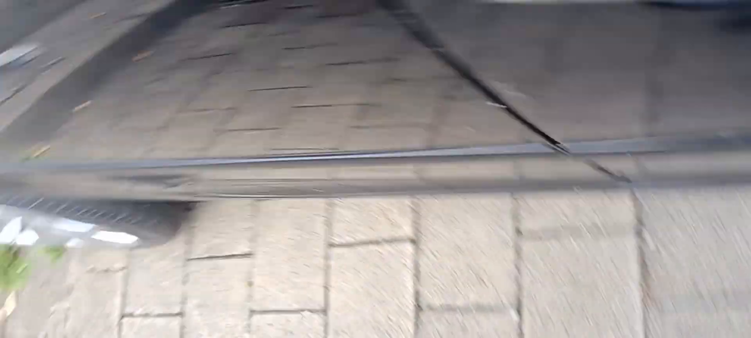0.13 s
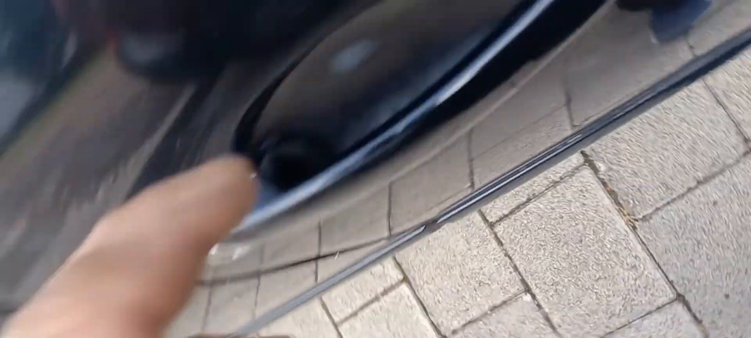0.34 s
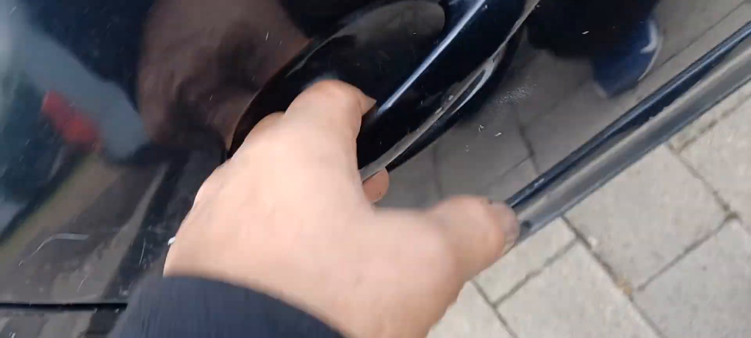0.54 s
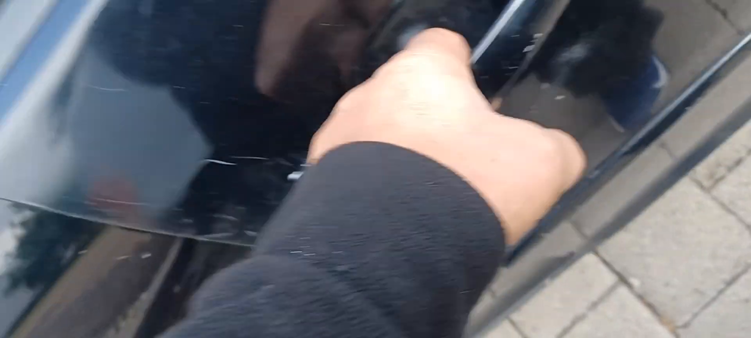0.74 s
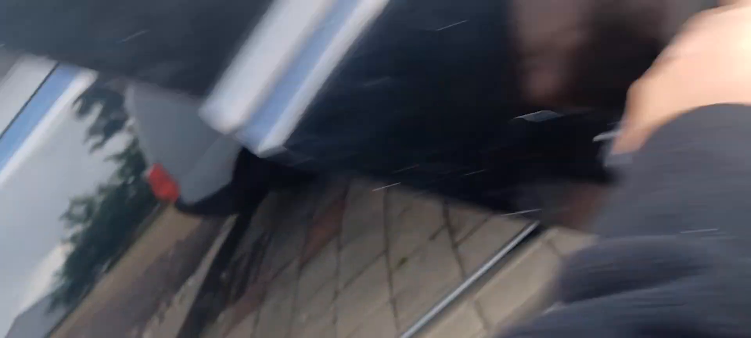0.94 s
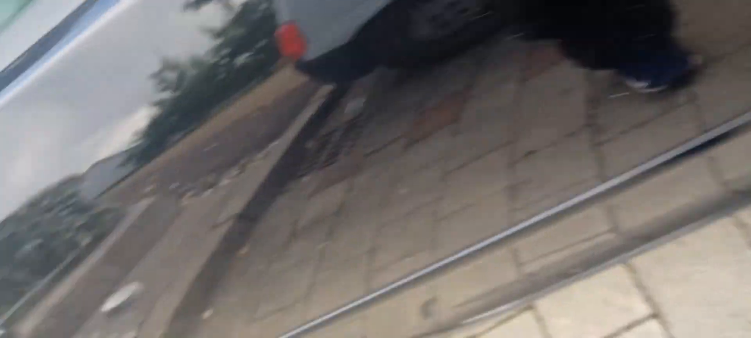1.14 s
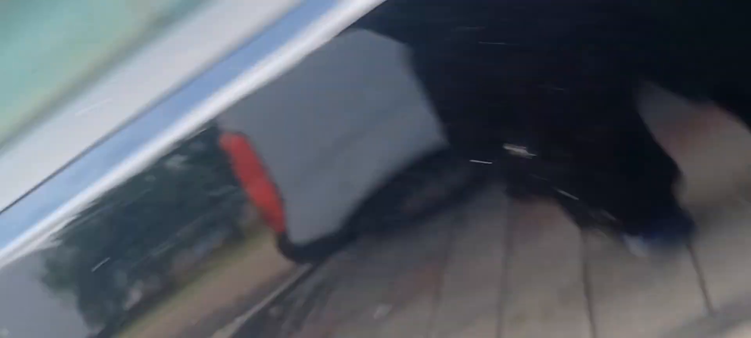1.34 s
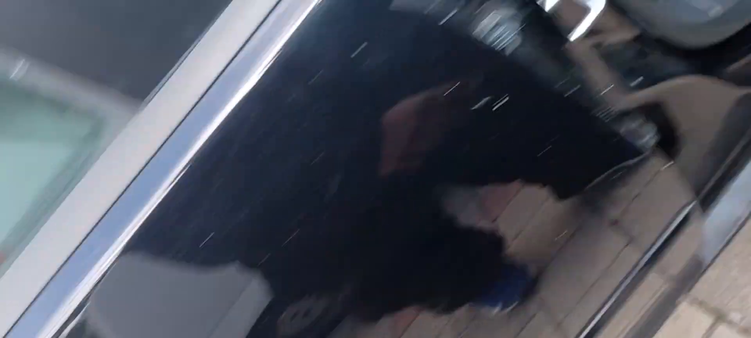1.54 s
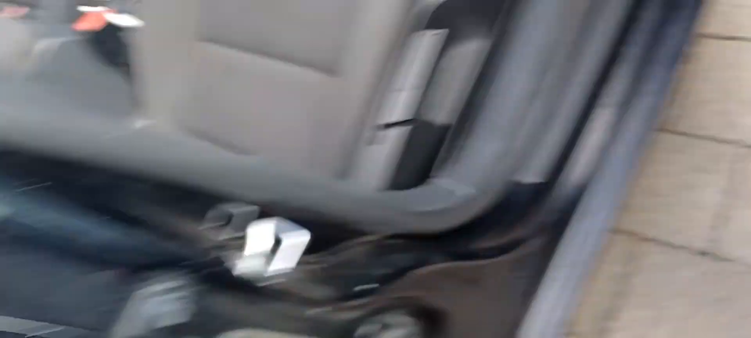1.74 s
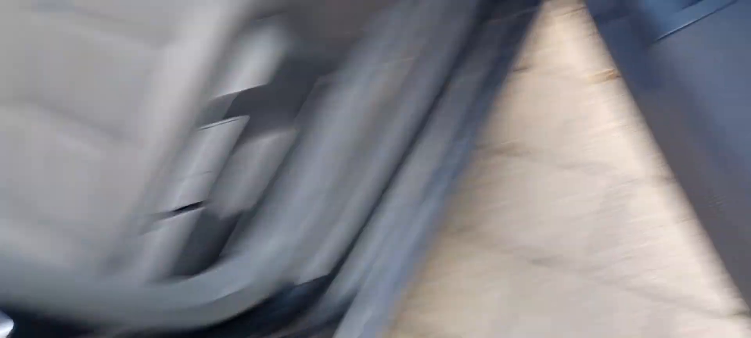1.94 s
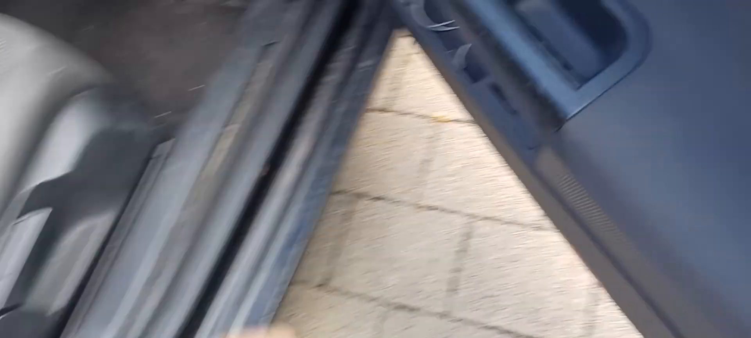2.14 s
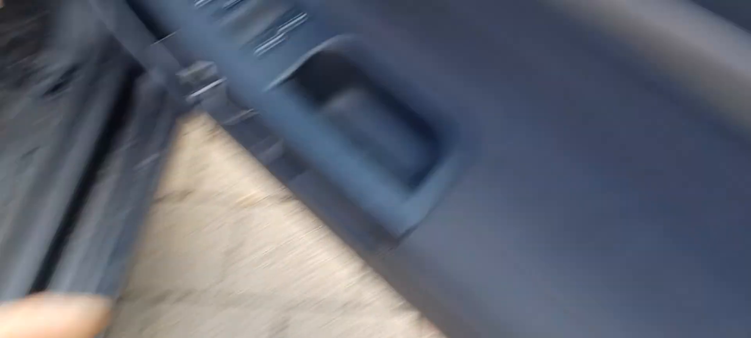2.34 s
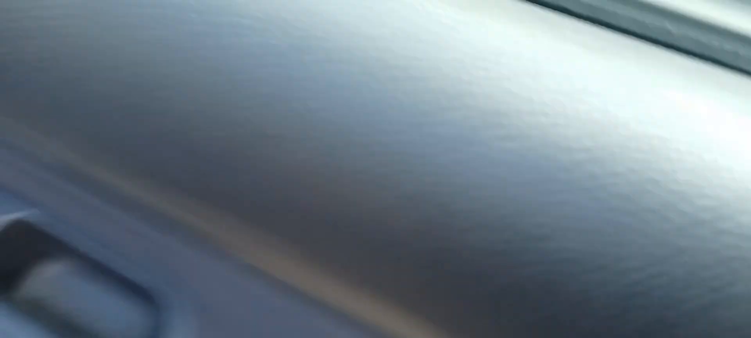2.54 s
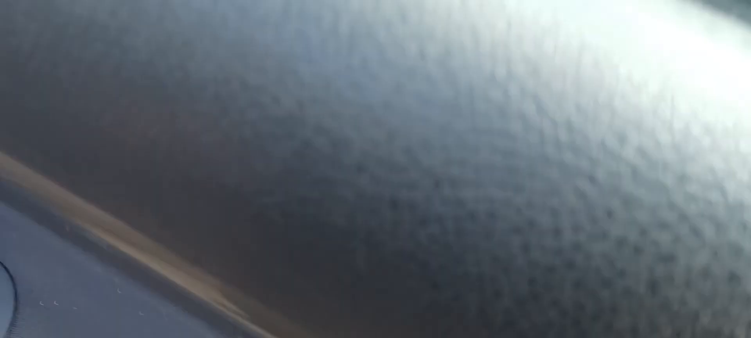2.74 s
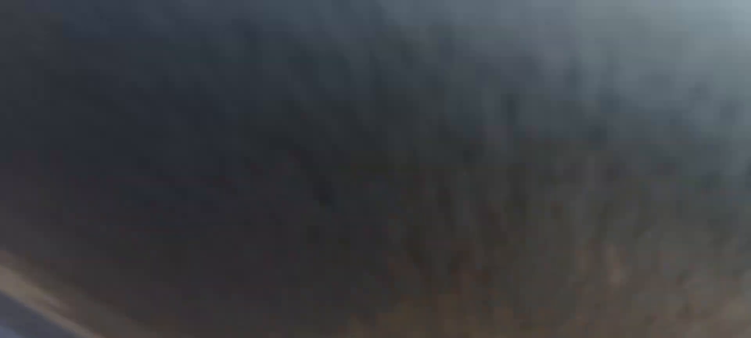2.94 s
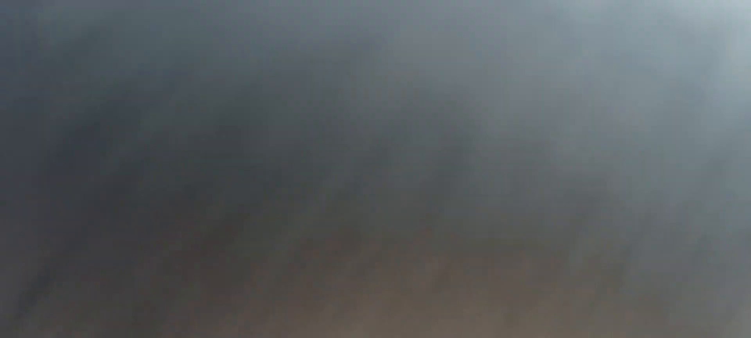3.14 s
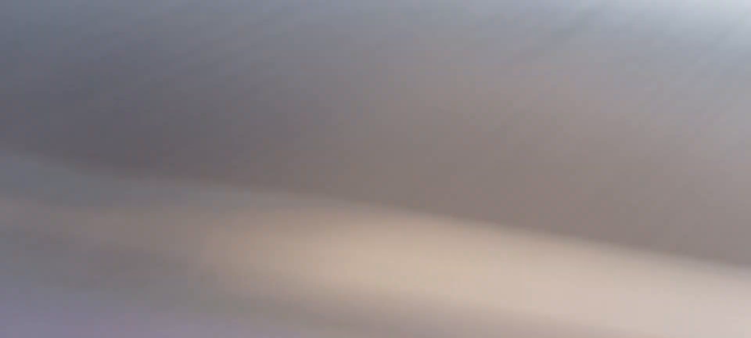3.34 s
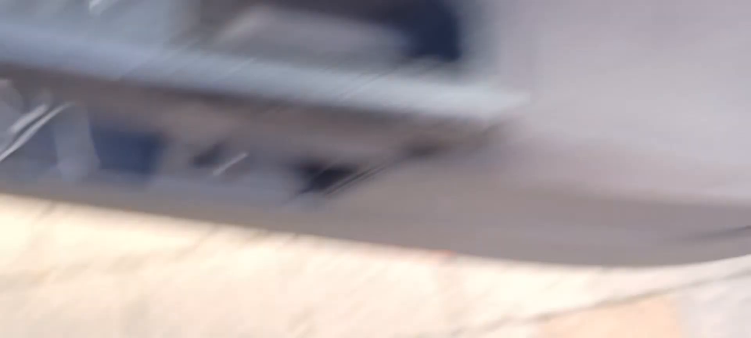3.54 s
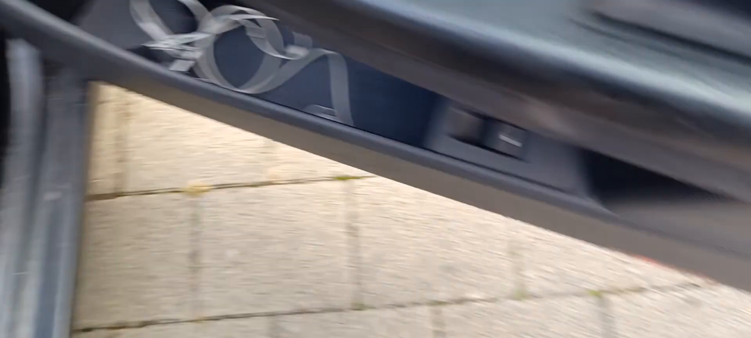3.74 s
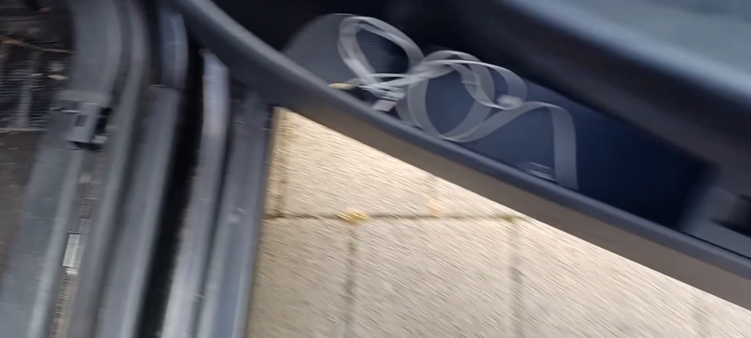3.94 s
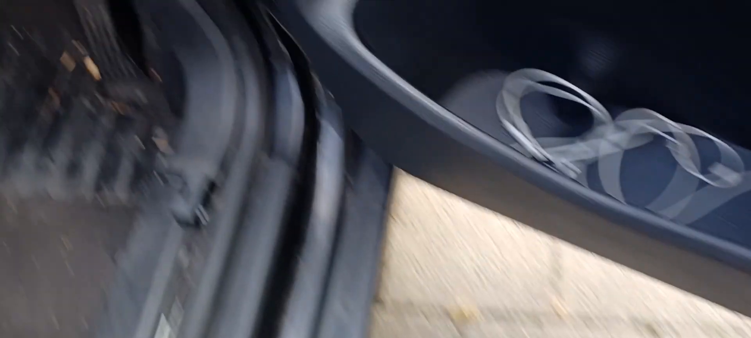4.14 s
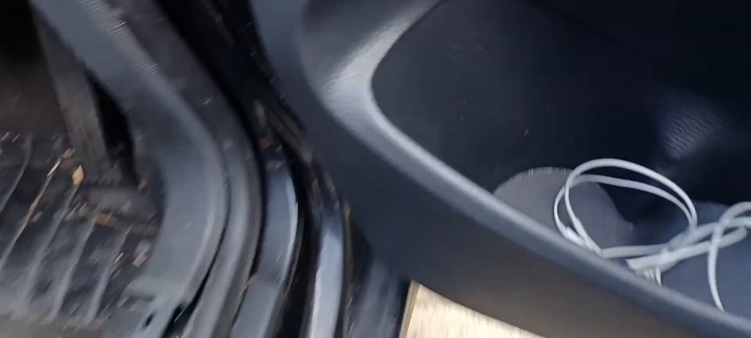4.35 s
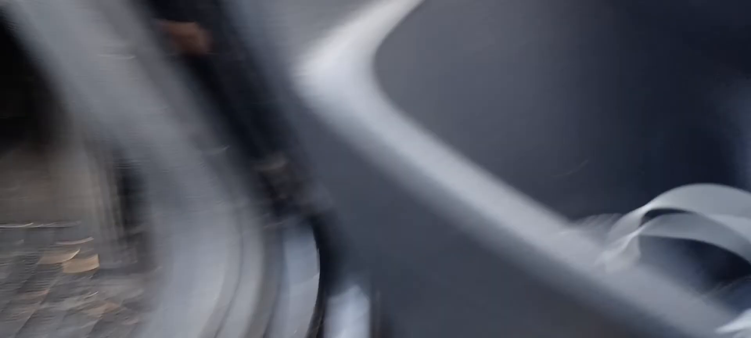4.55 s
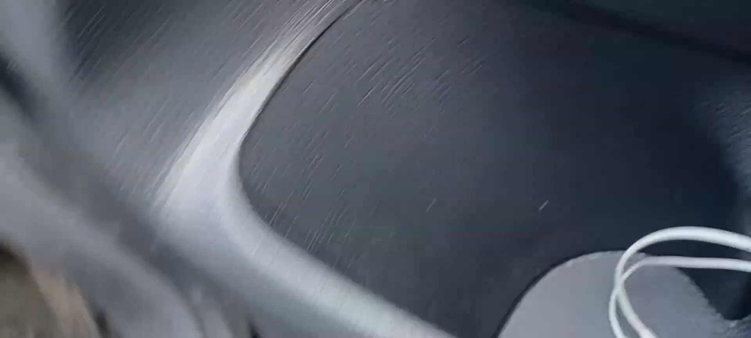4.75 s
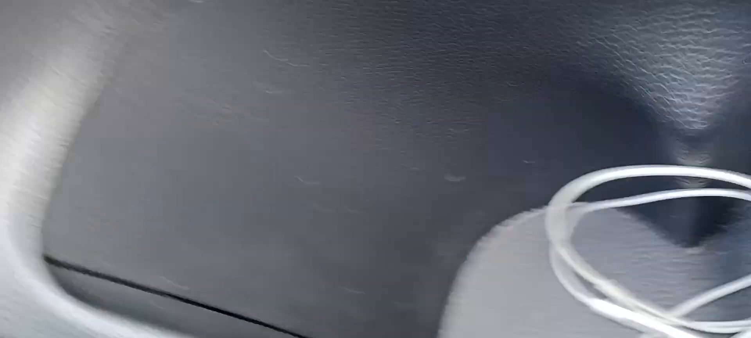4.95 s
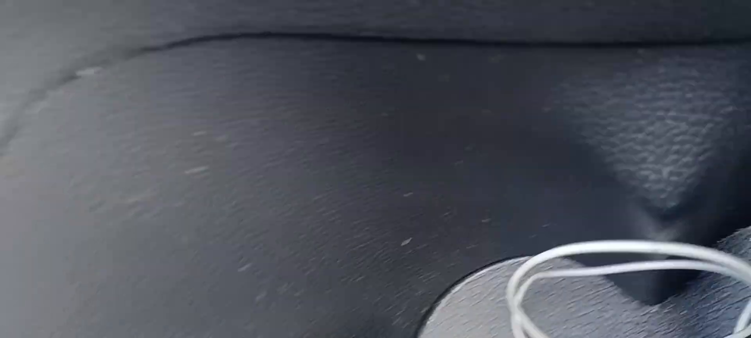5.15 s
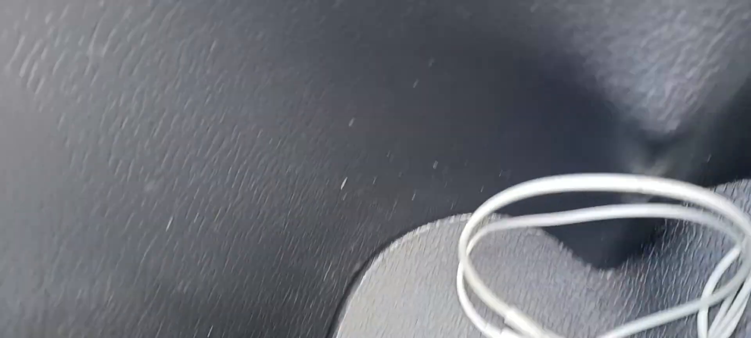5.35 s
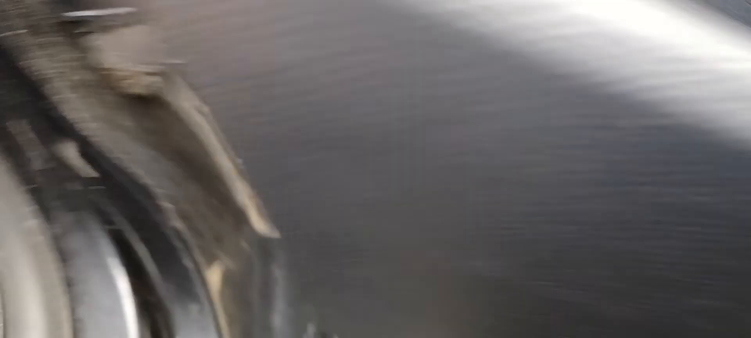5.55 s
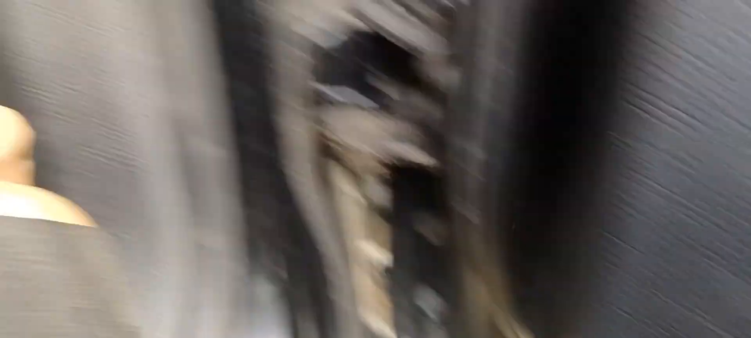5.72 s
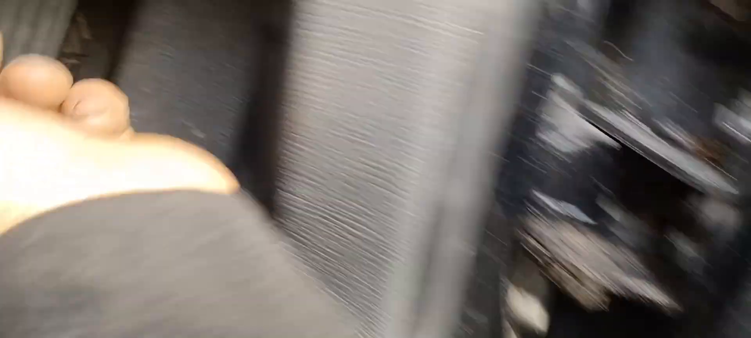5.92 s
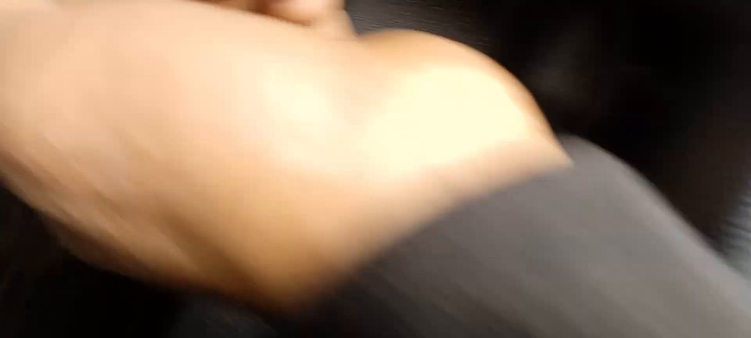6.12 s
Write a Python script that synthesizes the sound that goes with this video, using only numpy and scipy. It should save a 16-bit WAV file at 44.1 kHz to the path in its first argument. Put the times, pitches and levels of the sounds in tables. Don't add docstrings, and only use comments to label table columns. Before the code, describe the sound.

Outdoors, very close to a hand-held stereo recorder, a car door handle rattles and the latch lets go with a loud, hollow sheet-metal thunk and sharp click, then another clunk. Afterwards come dull low bumps, dry finger ticks, brief scuffs and cloth rustle in uneven bursts, with near silence between them. A faint trim squeak comes near the end.

```python
import sys
import numpy as np
from scipy import signal
from scipy.io import wavfile

SR = 44100
rng = np.random.default_rng(int(sys.argv[2]) if len(sys.argv) > 2 else 0)


def put_to_file(sound):
    columns = np.atleast_2d(sound).T
    safe = np.clip(columns, -1, 1)
    whole_steps = np.round(safe * 32767)
    wavfile.write(sys.argv[1], SR, whole_steps.astype(np.int16))


def undo_db(level):
    steps = np.asarray(level, float) / 20
    return 10 ** steps


N = 272538

# start_s, low_peak_db, second_peak_db, upper_peak_db, latch_crack_db, damping_factor
DOOR_BLOWS = [(0.377, -39, -37.5, -49, -45.5, 1.14), (0.395, -29.5, -36.5, -52, -49, 1.3),
              (0.43, -29, -40, -60, -52.5, 1.01), (0.536, -29.5, -24, -34, -35, 1.2),
              (0.551, -22.5, -21, -37.5, -31, 1.3), (0.593, -13.5, -18.5, -30.5, -30, 0.99),
              (0.606, -15, -20.5, -41, -41, 0.88), (0.682, -18.5, -11.5, -25, -33, 1.1),
              (0.691, -8, -16, -23, -9, 0.9), (0.697, -13.5, -7, -15.5, -27.5, 1.1),
              (0.721, -9, -14.5, -29, -40, 1.02), (0.95, -35, -44, -69, -69, 1.34),
              (1.055, -22, -18.5, -35, -31, 0.72), (1.064, -13.5, -14, -22.5, -41, 1.16)]
# mode_hz, level_db, t60_s
SKIN_LOW_MODES = [(140, 3.2, 0.23), (80, -14.5, 0.19), (150.8, -7, 0.37)]
# mode_hz, level_db, t60_s
SKIN_SECOND_MODES = [(242, 4.3, 0.16), (265.6, -3, 0.26), (217, -7, 0.31), (314.7, -9, 0.24)]
# mode_hz, level_db, t60_s
SKIN_UPPER_MODES = [(446, -2.5, 0.13), (505, -7, 0.08), (415, -1.5, 0.17), (649, -8, 0.23), (783, -9, 0.14)]
# mode_hz, level_db, t60_s
LATCH_MODES = [(1220, 3.6, 0.042), (2050, 2.65, 0.025), (1110, -36, .9), (1564, -8, 0.063),
               (3440, -22, .06), (5320, -28.5, 0.18)]
# start_s, low_peak_db, low_hz, upper_peak_db, upper_hz, left_minus_right_db
KNOCKS = [(1.39, -38.5, 100, -62, 234.5, 16.5), (1.543, -51.5, 169, -42.5, 277, -5),
          (1.71, -31.5, 115, -47.5, 172, -21), (1.732, -54.5, 164, -34.5, 178.6, -8),
          (1.762, -41.5, 118, -40.5, 172, -10), (1.809, -37, 135, -51.5, 202, -6),
          (2.227, -45, 167, -40, 242, 4.5), (2.24, -30, 116, -36.5, 230, -3.5),
          (2.298, -40, 157, -46.5, 172, 1.5), (2.483, -19, 121, -25, 226, 4),
          (2.503, -20.5, 109, -26.5, 173.6, -6.5), (2.527, -28.5, 82.6, -39, 204, 6),
          (2.564, -34.5, 88, -44, 210, 3), (2.6, -32, 88.8, -42, 196, 10), (2.649, -32, 77.5, -48, 190, 9),
          (2.678, -43.5, 63, -38, 217, 3), (2.74, -49, 78.1, -68, 186, 6),
          (2.894, -54.5, 153, -51.5, 207, 0.0), (3.315, -50, 148, -50, 221, 1),
          (3.383, -41, 105, -43, 248, 8), (3.414, -31, 168, -35.5, 168, 6), (3.439, -27.5, 93, -32, 262, 4),
          (3.459, -26, 119, -31.5, 223, -8), (3.489, -31, 125, -38.5, 204, 2),
          (3.608, -49, 127, -38.5, 264, -4), (3.635, -40, 169, -29.5, 250, -6),
          (3.675, -36, 101.5, -38.5, 201.5, -6), (3.914, -47, 91.5, -68, 172, 26.5),
          (4.044, -28.5, 107, -63.5, 172.5, 38.5), (4.25, -38, 128, -33.5, 245, -4),
          (4.285, -27, 121, -31.5, 321, -4), (4.318, -29, 140, -42, 172, 1),
          (4.359, -38, 140, -38, 176, -2.0), (4.44, -15, 88, -38, 173, -13),
          (4.489, -28.5, 93, -35.5, 207, -2), (4.514, -38, 170, -36.5, 191, -3.0),
          (4.76, -51, 148, -45.5, 238, -2.5), (4.925, -31, 140, -35, 230, -1.5),
          (5.066, -33, 109, -29, 376, -5.5), (5.359, -37.5, 170, -41.5, 265, -3),
          (5.374, -53, 167, -44.5, 223, 7), (5.9, -73, 170, -52, 207, 4), (5.999, -62, 170, -41.5, 232, 3),
          (6.098, -56, 170, -42, 226, -6), (6.111, -30, 107, -44, 252, 2)]
# start_s, peak_db, low_mid_tilt_db, treble_tilt_db, t60_s, left_minus_right_db
TICKS = [(0.3735, -46, 6, -33, 0.04, -2), (0.3925, -53, 15, -24.5, 0.053, -3),
         (0.4509, -45, -2, -16, 0.045, -3.5), (0.4748, -50.5, -8, -10.5, 0.04, -3.5),
         (0.5174, -54, -15, -22, 0.03, -2), (0.5272, -32.5, -19, -35, 0.04, -8),
         (0.5344, -29.5, -7, -30.5, 0.053, -17), (0.5487, -26, 3.5, -33, 0.046, 0),
         (0.5846, -37.5, 13, -36.5, 0.053, 4), (0.5924, -26.5, 5, -31, 0.05, -9),
         (0.6279, -42.5, 18, -34, 0.04, -12), (0.6793, -32, 1, -26, 0.037, -8),
         (0.688, -14.5, -17, -25.5, 0.04, 2), (0.6951, -12.5, 14, -26.5, 0.04, -14),
         (0.7255, -27, 0, -17, 0.04, 14), (0.9188, -52, -7, -27, 0.04, -1),
         (1.0533, -13.5, 4, -15, 0.04, -11.5), (1.1186, -29.5, -11, -30.5, 0.04, -7),
         (1.2923, -26.5, -1, -17, 0.04, -18), (1.3076, -33, -8, -10, 0.04, -10),
         (1.5444, -63.5, 20, -27, 0.02, -9), (1.726, -40.5, -2, -31, 0.098, -11.0),
         (2.0522, -52.5, -18.5, -12, 0.021, -14), (2.1231, -56, -29, -34, 0.03, -19.5),
         (2.2154, -50.5, 8, -32.5, 0.098, -8), (2.4822, -55, -2, -12, 0.04, -17),
         (2.4878, -26, 11, -13, 0.02, -9), (2.5026, -13, 6, -23.5, 0.045, -2),
         (2.573, -36, -10, -18, 0.04, -11.5), (2.5814, -37, -6, -18, 0.042, -10.5),
         (2.6093, -50, 3, -11, 0.072, -20), (2.819, -36.5, -33.5, -13.5, 0.04, -7),
         (2.8434, -50, -27.5, -5.5, 0.054, -21.5), (2.8948, -40, 7.5, -27, 0.042, -16),
         (3.4108, -47.5, 6, -19, 0.091, -6), (3.4496, -37, -12, -21, 0.088, -5),
         (3.4765, -35, -21, -25.5, 0.098, -7), (3.5313, -18.5, -46, -27, 0.066, -10),
         (3.5474, -32, -28, -31, 0.032, -1), (3.6247, -47, 9, -33, 0.06, -8),
         (3.725, -57, -3, -23, 0.034, -5), (4.1064, -52.5, -15, 1, 0.065, -16),
         (4.2804, -25, -6, -20.5, 0.04, -15), (4.368, -35, -21, -15.5, 0.04, -8),
         (4.404, -46, -1, 6.5, 0.04, 2), (4.4383, -20, -4.5, -6, 0.049, -7),
         (4.4454, -22, -5, -18, 0.04, -10), (4.489, -28.5, -3.5, -11, 0.04, -12),
         (4.564, -38.5, -25, -12.5, 0.029, -21), (4.904, -42, 6, -23, 0.017, -21),
         (5.0724, -26.5, -6.5, -15, 0.04, -14), (5.5678, -63, -4, -25, 0.04, -13.5),
         (5.5787, -64, -2, -25, 0.04, -8), (5.8409, -48, -14, -20.5, 0.03, -10),
         (6.099, -37, 10, -25.5, 0.033, 1), (6.1125, -30.5, -17, -36, 0.016, -18)]
# start_s, peak_db, low_mid_tilt_db, treble_tilt_db, length_s, left_minus_right_db
SCUFFS = [(0.6943, -23, -4, -9, 0.052, -4.5), (1.0545, -29.5, -2.5, -24.5, 0.038, -5),
          (0.1326, -25.5, -7, -2, 0.055, -1), (1.2141, -29.5, -12, -10.5, 0.055, -5),
          (1.3259, -41.5, 1, -18.5, 0.031, -5.5), (2.6449, -19, -14, -10.5, 0.049, -6.5),
          (2.6673, -39.5, -10, -20.5, 0.047, -1), (3.0041, -26, -23, -14.5, 0.048, -8),
          (3.3094, -35, -16.5, -46, 0.05, -8.5), (5.3428, -39.5, 4, -17.5, 0.059, -10),
          (5.9644, -31, -6, -14, 0.072, -12.0)]
# time_s, mid_db, low_mid_db, treble_db, left_minus_right_db
RUSTLE = [(0.0, -42.5, -55.5, -52.5, 2), (0.22, -69, -78, -74.5, -1), (0.65, -84, -59.5, -84, -6.5),
          (0.96, -74.5, -66, -94.5, -10.5), (1.17, -66, -60, -72.5, -6), (1.41, -72.5, -76, -89.5, -9),
          (2.32, -76.5, -81, -92.5, -8.5), (2.77, -69, -81, -79, -10.5), (3.61, -67, -66, -83, -5),
          (3.97, -76, -89.5, -90.5, -12.5), (4.47, -51, -62, -62.5, -11.5), (4.68, -56, -70.5, -62, 0),
          (4.94, -53, -60, -59, -6), (5.4, -65.5, -70.5, -80, -10), (5.96, -51, -56.5, -63.5, -6.5),
          (6.18, -52, -57, -64, -6)]
# freq_hz, density_db (per Hz)
PORT_COLOUR = [(250, -29), (420, 1.5), (546, -6.5), (720, -3.5), (1040, -9), (1330, -8.5), (1550, -8),
               (2150, -9), (3790, -13.5), (4920, -12), (8970, -18), (15100, -6), (15900, -20.5),
               (16600, -44.5)]
# freq_hz, likeness (0 to 1)
PORT_LIKENESS = [(450, 0.51), (1500, .3), (4000, 0.19), (16000, 0.065)]
# low_hz, high_hz
TONE_REGIONS = [(450, 1500), (1500, 8000), (9000, 16000)]
# time_s, pitch_hz, level_db
SQUEAK = [
    (5.85, 960, -73),
    (5.87, 980, -47.5),
    (5.895, 1000, -55),
    (5.92, 1250, -46.5),
    (5.96, 1300, -49),
    (5.98, 900, -53),
    (6.05, 880, -46),
    (6.12, 1000, -63),
    (6.15, 1150, -57),
    (6.18, 1250, -62),
]
# time_s, shell_db, cavity_db
RUMBLE = [(0.0, -47.5, -54), (0.41, -68, -72), (0.62, -41.5, -48.5), (2.15, -70, -72), (2.48, -56.5, -63),
          (2.63, -41.5, -66), (2.91, -74.5, -66.5), (3.32, -69.5, -71), (3.56, -40, -50),
          (3.82, -58, -71.5), (4.03, -60.5, -70), (4.39, -36.5, -46), (4.66, -55.5, -58.5),
          (4.9, -54, -44.5), (5.71, -67.5, -62.5), (6.18, -57.5, -44)]
# centre_hz, width_hz, level_db
SHELL_MODES = [(60, 14, -5.5), (95, 30, 1.6), (135, 45, -1)]
# centre_hz, width_hz, level_db
CAVITY_MODES = [(205, 40, -4.5), (250, 35, 1.05), (350, 62, -6.5)]


def rms_one(x):
    return x / np.sqrt(np.mean(x ** 2) + 1e-20)


def in_time(rows):
    time_s, *columns = np.transpose(rows)
    return [np.interp(np.arange(N) / SR, time_s, column) for column in columns]


def at_hz(points, hz):
    point_hz, value = np.transpose(points)
    return np.interp(np.log(hz), np.log(point_hz), value)


def sides(pan_db):
    ratio = undo_db(np.asarray(pan_db))
    return np.array([2 * ratio / (1 + ratio), 2 / (1 + ratio)])


def drift(rate_hz):
    hop = 40
    pole = np.exp(-2 * np.pi * rate_hz * hop / SR)
    noise = rng.standard_normal(N // hop + 2002)
    slow = signal.lfilter([1], [1, -2 * pole, pole * pole], noise)[2000:]
    return np.interp(np.arange(N) / hop, np.arange(len(slow)), rms_one(slow))


def add(out, start_s, sound):
    i = round(start_s * SR)
    out[..., i:i + sound.shape[-1]] += sound[..., :N - i]


def ring(hz, t60_s, rise_s, length_s=.9):
    t = np.arange(int(length_s * SR)) / SR
    return np.sin(2 * np.pi * hz * t) * undo_db(-60 * t / t60_s) * (1 - np.exp(-t / rise_s))


def resonant(noise, modes):
    out = 0
    for k, (hz, width_hz, level_db) in enumerate(modes):
        r = np.exp(-np.pi * width_hz / SR)
        poles = [1, -2 * r * np.cos(2 * np.pi * hz / SR), r * r]
        band = signal.lfilter([1 - r * r, 0, r * r - 1], poles, noise)
        out = out + (-1) ** k * undo_db(level_db) * band
    return rms_one(out)


def door():
    out = np.zeros((2, N))
    groups = [(SKIN_LOW_MODES, .004, -1.1), (SKIN_SECOND_MODES, .002, -1.5),
              (SKIN_UPPER_MODES, .001, -4.1), (LATCH_MODES, .0004, -7.1)]
    luck = rng.standard_normal((len(DOOR_BLOWS), 20))
    for (start_s, *levels_db, damping), row in zip(DOOR_BLOWS, luck):
        for (modes, rise_s, pan_db), group_db in zip(groups, levels_db):
            sound = 0
            for k, (hz, db, t60_s) in enumerate(modes):
                mode_db = group_db + db - 3.0 + 1.5 * row[k]
                sound = sound + undo_db(mode_db) * ring(hz, t60_s * damping, rise_s)
            add(out, start_s, sound * sides(pan_db)[:, None])
    return out


def knocks():
    out = np.zeros((2, N))
    for start_s, low_db, low_hz, upper_db, upper_hz, pan_db in KNOCKS:
        low = undo_db(low_db + 3.1) * ring(low_hz, 12.3 / low_hz, .003, .4)
        upper = undo_db(upper_db + 6.9) * ring(upper_hz, 22.1 / upper_hz, 0.00066, .4)
        add(out, start_s, low * sides(pan_db)[:, None])
        add(out, start_s, upper * sides(0.49 * pan_db)[:, None])
    return out


def rustle_strength():
    mid_db, low_db, treble_db, pan_db = in_time(RUSTLE)
    grain_db = 1.1 * np.minimum(rng.exponential(1, N), 5) + 3.9 * drift(25) + 2.0
    return undo_db([low_db, mid_db, treble_db])[:, None] * sides(0.87 * pan_db) * undo_db(grain_db)


def add_touch(strength, start_s, level_db, low_db, treble_db, pan_db, shape):
    region_gain = undo_db(level_db + np.array([low_db, 0, treble_db]))[:, None, None]
    add(strength, start_s, region_gain * sides(pan_db)[:, None] * shape)


def add_ticks(strength):
    t = np.arange(int(.25 * SR)) / SR
    for start_s, peak_db, low_db, treble_db, t60_s, pan_db in TICKS:
        shape = undo_db(-60 * t / (0.08 * t60_s)) + undo_db(-8 - 60 * t / t60_s)
        add_touch(strength, start_s, peak_db - 5.5, low_db, treble_db, pan_db, shape)


def add_scuffs(strength):
    t = np.arange(int(.25 * SR)) / SR
    for start_s, peak_db, low_db, treble_db, length_s, pan_db in SCUFFS:
        shape = (1 - np.exp(-t / .008)) / (1 + (t / length_s) ** 12)
        add_touch(strength, start_s, peak_db - 14, low_db, treble_db, pan_db, shape)


def contacts():
    strength = rustle_strength()
    add_ticks(strength)
    add_scuffs(strength)
    hz = np.arange(400, 16600, 10)
    power = undo_db(2 * at_hz(PORT_COLOUR, hz))
    share = [np.sum(power[(hz > low) & (hz < high)]) * 20 / SR for low, high in TONE_REGIONS]
    strength = strength / np.sqrt(share)[:, None, None]

    out = 0
    white = rng.standard_normal((2, 2, N))
    edges_hz = 420 * 2 ** np.arange(0, 5.4, 1 / 3)
    for k, (low_hz, high_hz) in enumerate(zip(edges_hz, edges_hz[1:])):
        centre_hz = np.sqrt(low_hz * high_hz)
        place = np.interp(np.log(centre_hz), np.log([950, 2200, 5500, 10000]), [0, 1, 1.2, 1.89])
        below = min(int(place), 1)
        blend = place - below
        envelope = strength[below] ** (1 - blend) * strength[below + 1] ** blend
        alike = np.clip(at_hz(PORT_LIKENESS, centre_hz), 0, 1)
        mid, side = white[k % 2]
        noise = (np.sqrt(1 + alike) * mid + np.sqrt(1 - alike) * side * [[1], [-1]]) / np.sqrt(2)
        sos = signal.butter(2, [low_hz, high_hz], "band", fs=SR, output="sos")
        gain = undo_db(at_hz(PORT_COLOUR, centre_hz) + 2.7 * drift(4.1))
        out = out + gain * signal.sosfilt(sos, envelope * noise)
    return out


def squeak():
    pitch_hz, level_db = in_time(SQUEAK)
    phase = 2 * np.pi * np.cumsum(pitch_hz * (1 + .012 * drift(57.6))) / SR
    started = np.arange(N) > SQUEAK[0][0] * SR
    return undo_db(level_db + 2.2 * drift(40)) * np.sin(phase) * started


def rumble():
    shell_db, cavity_db = in_time(RUMBLE)
    mid, side, air, air_side = rng.standard_normal((4, N))
    shell = resonant(mid + .45 * side * [[1], [-1]], SHELL_MODES)
    cavity = resonant(air + .25 * air_side * [[1], [-1]], CAVITY_MODES)
    shell = shell * undo_db(shell_db + 2.5 * drift(14))
    cavity = cavity * undo_db(cavity_db + 3.7 * drift(20))
    return (shell + cavity) * sides(-1.8)[:, None]


def scene():
    return door() + knocks() + contacts() + squeak() + rumble()


def low_pass(x):
    return signal.sosfilt(signal.butter(12, 16820, fs=SR, output="sos"), x)


def record(dry):
    bass_cut = signal.butter(2, 42, "high", fs=SR, output="sos")
    x = signal.sosfilt(bass_cut, dry)
    mix = 1.306 * np.tanh(x / 1.298)
    return low_pass(mix)


dry = scene()
out = record(dry)
put_to_file(out)
```